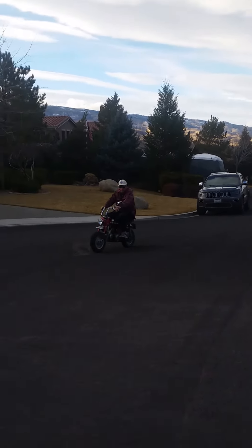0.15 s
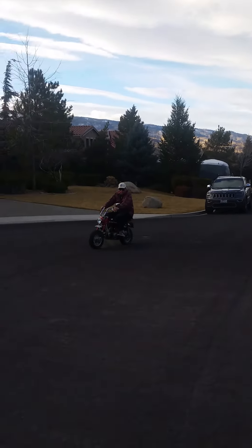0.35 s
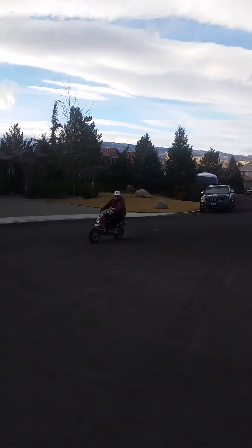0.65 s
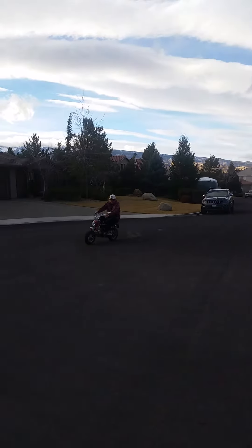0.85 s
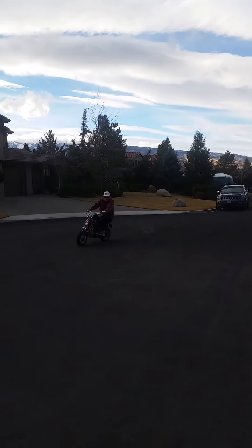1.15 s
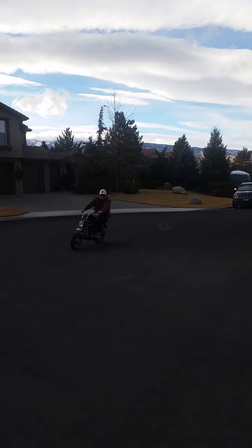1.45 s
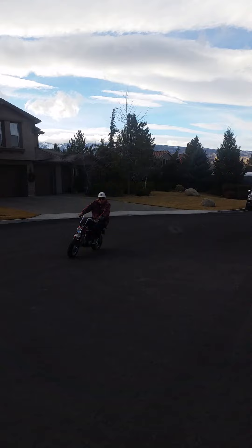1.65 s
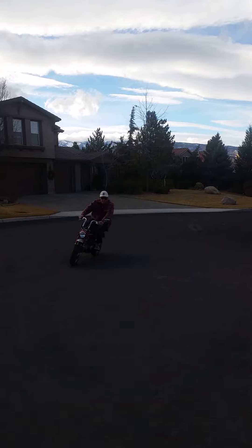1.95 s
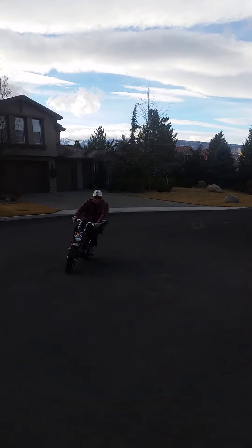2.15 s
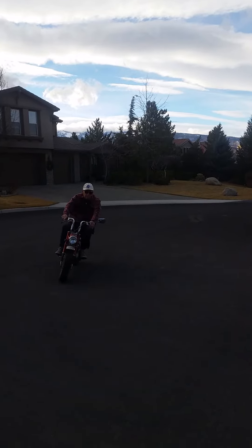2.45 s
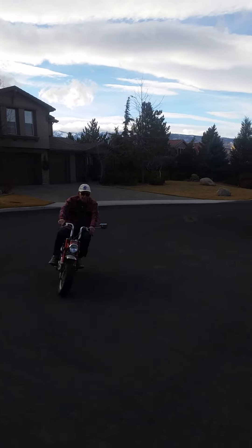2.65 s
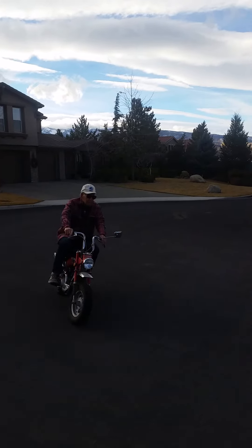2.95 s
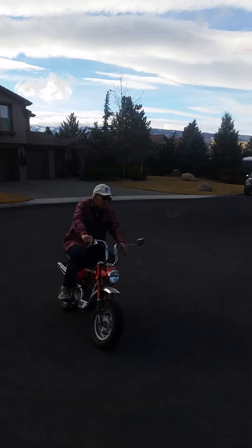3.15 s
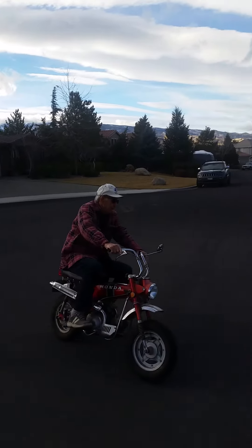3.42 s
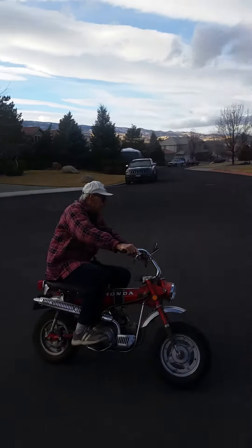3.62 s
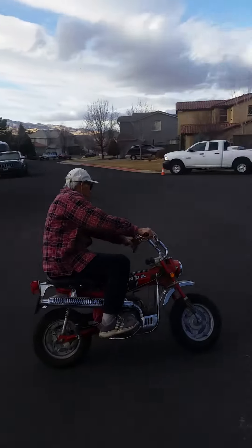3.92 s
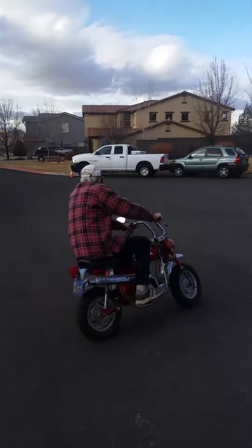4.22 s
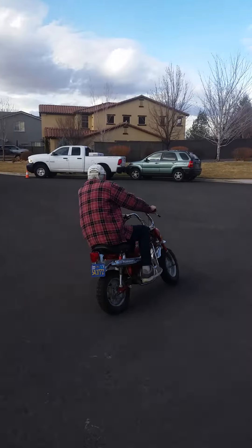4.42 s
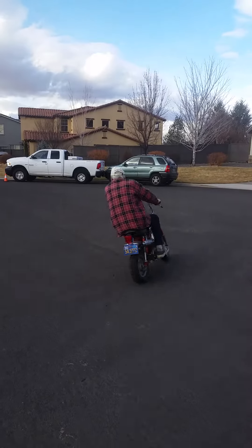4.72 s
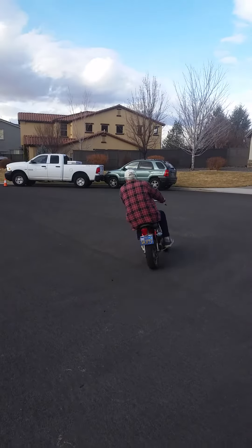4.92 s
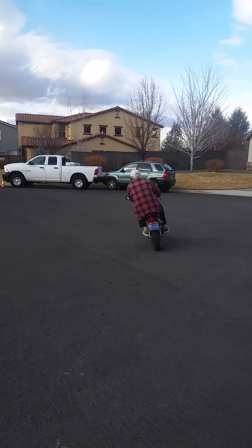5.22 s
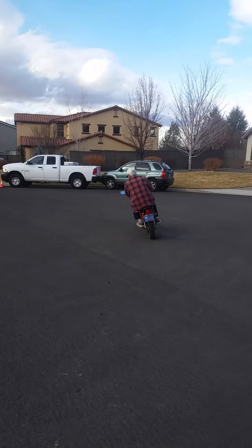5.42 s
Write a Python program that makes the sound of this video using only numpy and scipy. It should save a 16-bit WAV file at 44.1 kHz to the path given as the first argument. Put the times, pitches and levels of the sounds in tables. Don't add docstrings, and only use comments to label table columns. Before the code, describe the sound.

Outdoors on a residential street, a hand-held phone is buffeted by low, fluttering wind, crackling mostly on the left. A small four-stroke minibike putters faintly beneath it, approaches, passes close around three and a half to four seconds with thump and metallic clatter, then leaves with raspy exhaust puffs and slightly rising revs.

```python
import sys
import numpy as np
from scipy import signal
from scipy.fft import rfft, irfft
from scipy.io import wavfile
from scipy.ndimage import uniform_filter1d, map_coordinates

SR = 44100
rng = np.random.default_rng(int(sys.argv[2]) if len(sys.argv) > 2 else 0)


def voltage_ratio(level):
    return 10 ** (np.asarray(level, float) / 20)


def inscribe(sig):
    pcm = np.round(np.clip(np.atleast_2d(sig).T, -1, 1) * 32767)
    wavfile.write(sys.argv[1], SR, pcm.astype(np.int16))


N = 245975


def rms_one(x):
    return x / np.sqrt(np.mean(x ** 2) + 1e-20)


def in_time(rows):
    s, *columns = np.transpose(rows)
    return [np.interp(np.arange(N) / SR, s, c) for c in columns]


def drift(rate_hz):
    r = np.exp(-2 * np.pi * rate_hz / SR)
    noise = rng.standard_normal(N + 4000)
    return rms_one(signal.lfilter([1], [1, -2 * r, r * r], noise)[4000:])


def butter(x, hz, kind, order=2):
    return signal.sosfilt(signal.butter(order, hz, kind, fs=SR, output="sos"), x)


def resonate(x, hz, width_hz):
    r = np.exp(-np.pi * width_hz / SR)
    poles = [1, -2 * r * np.cos(2 * np.pi * hz / SR), r * r]
    return signal.lfilter([(1 - r * r) / 2, 0, (r * r - 1) / 2], poles, x)


def resonate_twice(x, hz, width_hz):
    return resonate(resonate(x, hz, width_hz), hz, width_hz)


def swell(clicks, ms):
    r = np.exp(-1000 / (ms * SR))
    return signal.lfilter([0, np.e * (1 - r)], [1, -2 * r, r * r], clicks + 1e-18)


def delay(x, ms):
    return np.pad(x, (int(ms * 1e-3 * SR), 0))[:N]


def colour(x, points):
    hz, db = np.transpose(points)
    grid = np.maximum(np.fft.rfftfreq(4096, 1 / SR), 1)
    cepstrum = irfft(np.interp(np.log(grid), np.log(hz), db) * np.log(10) / 20)
    cepstrum[1:2048] *= 2
    cepstrum[2049:] = 0
    return signal.fftconvolve(x, irfft(np.exp(rfft(cepstrum))))[:N]


def air(likeness):
    common, left, right = rng.standard_normal((3, N))
    return np.sqrt(likeness) * common + np.sqrt(1 - likeness) * np.array([left, right])


def street_floor():
    murmur = voltage_ratio(-52) * butter(air(.3), 4000, "low")
    far_whir = voltage_ratio(-52) * resonate(air(.3), 5650, 250)
    return murmur + far_whir


def gusting(gusts):
    lull_db, lull_hz = -40, 200
    s, db, rise, fall, hz = np.transpose(gusts)[:, :, None]
    since = np.arange(0, N + 64, 64) / SR - s
    below_peak = np.maximum(-since / np.abs(rise), since / np.abs(fall))
    power = voltage_ratio(2 * (db - 10 * below_peak))
    total = power.sum(axis=0) + voltage_ratio(2 * lull_db)
    rate_hz = ((power * hz).sum(axis=0) + voltage_ratio(2 * lull_db) * lull_hz) / total
    return in_time(np.transpose([since[0] + s[0], 10 * np.log10(total), rate_hz]))


def wind(gusts):
    level_db, rate_hz = gusting(gusts)
    flutter = .6 * drift(24.84) + .5 * drift(90.2)
    speed = (rate_hz / 200) ** .85 * 2 ** (.25 * flutter)
    gain = voltage_ratio(level_db + 4.2 * flutter + 0.9 * drift(12.5))
    eddies = butter(rng.standard_normal(5 * N), 171, "low")
    eddies = rms_one(butter(eddies, 494, "low", order=1))
    passing = map_coordinates(eddies, [np.cumsum(speed) + 2000], order=1)
    passing = butter(passing, 69.8, "high")
    return gain * passing / uniform_filter1d(passing ** 2, size=2600) ** 0.36


def whips(fronts, ms):
    out = np.zeros(N + 1800)
    t_ms = np.arange(-600, 1200) / SR * 1000
    for (s, db, factor), noise in zip(fronts, rng.standard_normal((len(fronts), len(t_ms)))):
        burst = butter(butter(noise, 270 * factor, "low", order=3), 100, "high")
        half_ms = 0.38 * ms * (3.05 / factor) ** 0.2
        shape = np.exp(-(t_ms / half_ms) ** 2)
        burst = burst / np.sqrt(np.average(burst ** 2, weights=shape ** 2))
        at = int(s * SR)
        out[at:at + len(t_ms)] += voltage_ratio(db + 6) * shape * burst
    return out[600:N + 600]


# middle in seconds, half length in seconds,
# level in dB, number of crackles.
CRACKLING = [(.515, .04, -19, 11), (1.5, .045, -18, 11), (1.61, .05, -23, 5), (2.75, .04, -26, 4),
             (4.27, .05, -22, 6), (4.64, .05, -22, 5), (4.85, .04, -25, 4)]


def crackles():
    rows = []
    for s, half, db, count in CRACKLING:
        chances = rng.standard_normal((count, 3))
        for slot, (late, strong, fast) in zip(np.linspace(-1, 1, count), chances):
            at = s + half * (slot + .5 * late / count)
            level_db = db + 2 * strong - 3.3 * slot ** 2
            speedup = 4.94 * np.exp((db + 18.5) / 15 + .15 * fast - .5 * slot ** 2)
            rows.append((at, level_db, speedup))
    return rows


# peak time in seconds, peak level in dB, rise in seconds per 10 dB,
# fall in seconds per 10 dB (signs of both ignored), rate of passing eddies in Hz.
GUSTS_LEFT = [(.1, -11, 0.6, 0.17, 149.6), (.27, -12.5, 0.38, 0.24, 230.2), (.39, -15, .04, -0.02, 242.5),
              (.51, -10.5, 0.09, -0.11, 522.2), (.65, -13, 0.23, 0.21, 200),
              (1.32, -18.5, -0.09, 0.15, 155), (1.5, -11, -0.1151, 0.17, 501),
              (1.86, -18.5, 0.23, .28, 166.2), (2.16, -15, 0.11, 0.09, 150.1),
              (2.35, -19, -0.02, 0.09, 150.3), (2.74, -8.5, 0.19, 0.2, 200),
              (2.97, -17, -0.21, 0.07, 150.1), (3.31, -7.5, 0.1663, 0.21, 159.4),
              (3.6, -9.5, 0.09, -0.31, 180), (3.75, -6, 0.0449, -0.3, 125),
              (4.02, -10.5, -0.06, -0.06, 240.6), (4.18, -7.5, -0.05, -0.07, 291.7),
              (4.27, -9, 0.24, 0.07, 379), (4.58, -12.5, 0.21, 0.4, 271.9), (4.72, -11.5, 0, 0.42, 194),
              (4.85, -10, .1, 0.12, 387.7), (5.07, -14, 0.02, -0.16, 329.2), (5.22, -17, 0.16, 0.5, 155),
              (5.45, -16, -0.07, 0.26, 134.9)]
GUSTS_RIGHT = [(.21, -9, 0.037, 0.065, 125), (.32, -13, 0.039, 0.11, 120.5), (.44, -11, 0.097, 0.083, 200),
               (.58, -14, 0.16, 0.14, 149.4), (.99, -18.5, .03, 0.049, 130),
               (1.16, -13.5, 0.014, 0.091, 171.8), (1.32, -15.5, 0.097, 0.096, 109.4),
               (1.4, -17, 0.048, 0.32, 200), (1.62, -19, 0.19, 0.054, 100), (1.87, -21, 0.16, 0.21, 125),
               (2.19, -23, 0.096, .15, 109.8), (2.43, -19, 0.033, 0.19, 130.2),
               (2.64, -8, .14, 0.15, 169.3), (2.84, -11, 0.0805, .07, 130.2),
               (3.09, -18, 0.068, .045, 130.4), (3.35, -12.5, 0.053, .11, 120), (3.52, -1, .04, .08, 200),
               (3.78, -6.5, 0.086, 0.076, 150.6), (4.21, -15.5, 0.067, 0.096, 125),
               (4.46, -19, .11, .02, 121), (4.54, -15, 0.016, 0.032, 170.6), (4.81, -22.5, .17, 0.21, 100),
               (5.02, -12, 0.0496, .1, 125), (5.47, -12.5, 0.095, .3, 105.2)]
# time in seconds, peak level in dB, speed-up factor.
FRONTS_LEFT = [(.054, -16.5, 2.02), (.092, -16.5, 1.85), (.141, -14.5, 1.36), (.252, -8, 1.3),
               (.284, -7, 1.5), (.39, -15, 2.6), (.497, -5.5, 5.8), (.511, -10, 8.8), (.524, -14, 3.9),
               (.544, -9.5, 3.24), (.645, -14.5, 2), (.86, -21, 2.04), (1.488, -13.5, 4.13),
               (1.499, -13, 6.3), (1.519, -18.5, 4.3), (1.582, -16, 2.5), (1.602, -12, 2.5),
               (1.68, -22, 2.64), (2.755, -10.5, 1.9), (3.304, -21, 4), (4.053, -11, 2.65),
               (4.141, -16, 3.5), (4.184, -13, 2.57), (4.262, -6, 2.18), (4.291, -12, 2.7),
               (4.42, -17.5, 3), (4.614, -18.5, 4.45), (4.66, -13, 1.76), (4.801, -14, 4.84),
               (4.851, -8.5, 3.77)]
FRONTS_RIGHT = [(.418, -20, 3.7), (.444, -18, 2.6), (.575, -24, 3), (.666, -24, 1.98), (1.155, -21, 2),
                (1.359, -15.5, 1.53), (1.405, -22.5, 2.57), (2.731, -23.5, 2.61), (3.519, -24, 3.9),
                (3.586, -28, 3.8)]


def wind_at_ports():
    left = wind(GUSTS_LEFT) + whips(FRONTS_LEFT, ms=10.1)
    right = wind(GUSTS_RIGHT) + whips(FRONTS_RIGHT, ms=10.1)
    return np.array([left + whips(crackles(), ms=3.2), right])


# time in seconds, firings per second.
CRANK = [(0, 24.83), (.6, 24.85), (1.1, 24.81), (1.5, 26.06), (1.9, 25.39), (2.5, 24.63), (3.3, 25.07),
         (3.8, 25.88), (4.15, 25.31), (4.6, 26.97), (5.1, 28.31), (5.6, 29.85)]


def crank():
    start = .518
    return start + np.cumsum(in_time(CRANK)[0]) / SR


def firings(spread_db, jitter_ms, turn=0):
    cycles = crank()
    chance = rng.standard_normal((int(cycles[-1]), 2))
    due = np.interp(np.arange(len(chance)) + 1 + turn, cycles, np.arange(N), right=2 * N)
    at = (due + jitter_ms / 1000 * SR * chance[:, 0]).astype(int)
    inside = at < N
    clicks = np.zeros(N)
    clicks[at[inside]] = voltage_ratio(spread_db * chance[inside, 1])
    return clicks


# frequency in Hz, width in Hz, level in dB.
CASING = [(636, 410, -1), (1174, 500, 4.5), (1715, 466, 4), (2750, 860, 5), (3570, 1570, -1),
          (5760, 1230, 5)]


def casing_clatter(fire, heading):
    ticks = swell(firings(spread_db=-5, jitter_ms=1.4, turn=0.48), 0.2)
    knock = 0.17 + 0.55 * np.clip(heading / 40, 0, 1)
    beat = .5 + knock * swell(fire, 2.4) + 0.042 * ticks
    rattle = air(0.89) * beat * voltage_ratio(2.5 * drift(89))
    rattle = rattle - .7 * butter(rattle, 7000, "high", order=1)
    ringing = sum((-1) ** k * voltage_ratio(db) * resonate(rattle, hz, width)
                  for k, (hz, width, db) in enumerate(CASING))
    mesh = 2 * np.pi * crank() * 68
    whine = drift(45) * np.cos(mesh) + drift(45) * np.sin(mesh)
    return rms_one(ringing + voltage_ratio(-6.5) * rattle) + voltage_ratio(-11.5) * whine


# frequency in Hz, width in Hz, level in dB.
TAILPIPE = [(1150, 320, 0), (2630, 260, 8), (4050, 460, 6), (5500, 460, 5), (6450, 440, 4)]


def gas_puff(fire, heading):
    late = delay(fire, ms=.7)
    jet = swell(late, 1.2) + 0.035 * swell(late, 13)
    gas = air(0.41) * jet * voltage_ratio(2.5 * drift(370))
    rings = sum((-1) ** k * voltage_ratio(db + 3 * drift(16.2)) * resonate_twice(gas, hz, width)
                for k, (hz, width, db) in enumerate(TAILPIPE))
    facing = .6 - .4 * np.cos(np.radians(heading))
    return rms_one(rings + voltage_ratio(-8 * facing) * gas)


def overtone(fire, hz, level_db, ms):
    out, t = np.zeros(N + 1000), np.arange(1000) / SR
    for i in np.flatnonzero(fire):
        age = t * 1000 / ms[i]
        ring = age * np.exp(1 - age) * np.sin(2 * np.pi * hz[i] * t)
        out[i:i + 1000] += fire[i] * voltage_ratio(level_db[i]) * ring
    return out[:N]


# frequency in Hz, width in Hz, level in dB.
PIPE = [(184, 120, 0), (480, 130, -20)]


def exhaust_thump(first, fire, heading, over_hz, over_db):
    body = sum(voltage_ratio(db) * resonate_twice(fire, hz, width) for hz, width, db in PIPE)
    ring_ms = np.interp(heading, [0, 45, 125, 160], [2.2, 1.34, 1.38, 2.3])
    return rms_one(body) + overtone(first, over_hz, over_db + 17.5, ring_ms)


# time in seconds, clatter level in dB, thump level in
# dB.
BIKE = [(0, -45, -27.5), (.6, -59.5, -45), (1.2, -60.5, -41), (1.8, -52, -34), (2.4, -45.5, -29.5),
        (2.8, -44, -24), (3.15, -37, -18.5), (3.5, -37, -17.5), (3.95, -32, -23.5), (4.2, -36, -27.5),
        (4.45, -35, -19.5), (4.95, -43, -22), (5.58, -42.5, -24.5)]
# time in seconds, heading in degrees from nose-on 0 to tail-on 180.
HEADING = [(0, 0), (2.35, 0), (2.8, 20), (3.6, 75), (4.45, 155), (4.9, 180), (5.6, 180)]
# heading in degrees, puff level in dB over the clatter,
# overtone frequency in Hz, overtone level in dB.
ASPECT = [(0, -20.5, 477, -16.5), (12, -7, 560, -25), (20, -9, 919.5, -30.5), (46, 0, 913, -17.5),
          (73.99, 3, 714, -14.5), (100, .5, 476, -5.5), (125, 1.5, 630, -5), (155, 5, 418, -12.5),
          (180, 8.5, 422.7, -15.5)]


def minibike():
    clatter_db, thump_db = in_time(BIKE)
    heading, = in_time(HEADING)
    degrees, *pattern = np.transpose(ASPECT)
    puff_db, over_hz, over_db = [np.interp(heading, degrees, p) for p in pattern]

    first = firings(spread_db=.9, jitter_ms=.25)
    second = np.interp(heading, [75, 155], [.9, .1])
    fire = (first + second * delay(first, ms=4.9)) / (1 + .8 * second)

    thump = voltage_ratio(thump_db - 0.07) * exhaust_thump(first, fire, heading, over_hz, over_db)
    puff = voltage_ratio(puff_db) * gas_puff(fire, heading)
    bright = voltage_ratio(clatter_db + 9.5) * (casing_clatter(fire, heading) + puff)

    treble_db = -14 + .9 * (clatter_db + 34.5)
    low = butter(bright, 8560, "low", order=6)
    high = butter(bright, 9140, "high", order=4)
    bright = low + voltage_ratio(treble_db + 21.5 + 3 * drift(30)) * high

    pan_db = 1.5
    left, right = (thump + bright) * voltage_ratio(np.array([[pan_db], [-pan_db]]) / 2)
    lag_ms = .08 * np.sin(np.radians(0.806 * heading))
    left = map_coordinates(left, [np.arange(N) - lag_ms * SR / 1000], order=3)
    return np.array([left, right])


def scene():
    return street_floor() + wind_at_ports() + minibike()


# frequency in
# Hz, level in dB.
PORT_LEFT = [(60, -1), (1000, -5), (3000, -11), (7000, -7.5), (8300, -18), (9800, -33.5), (12000, -23.5),
             (15500, -22)]
PORT_RIGHT = [(60, .5), (1000, -9.5), (3000, -20), (4200, -26), (5000, -34.5), (8500, -38.5),
              (12000, -25.5), (15500, -16.5)]


def microphone_ports(dry):
    ports = np.array([colour(dry[0], PORT_LEFT), colour(dry[1], PORT_RIGHT)])
    return ports + voltage_ratio(-83) * butter(rng.standard_normal((2, N)), 10500, "high", order=4)


def top_cut(x):
    return signal.sosfilt(signal.butter(12, 16990, fs=SR, output="sos"), x)


def record(dry):
    limited = .98 * np.tanh(microphone_ports(dry) / .98)
    band_edge = signal.cheby2(14, 50, 16100, fs=SR, output="sos")
    mix = signal.sosfilt(band_edge, limited)
    return top_cut(mix)


dry = scene()
out = record(dry)
inscribe(out)
```